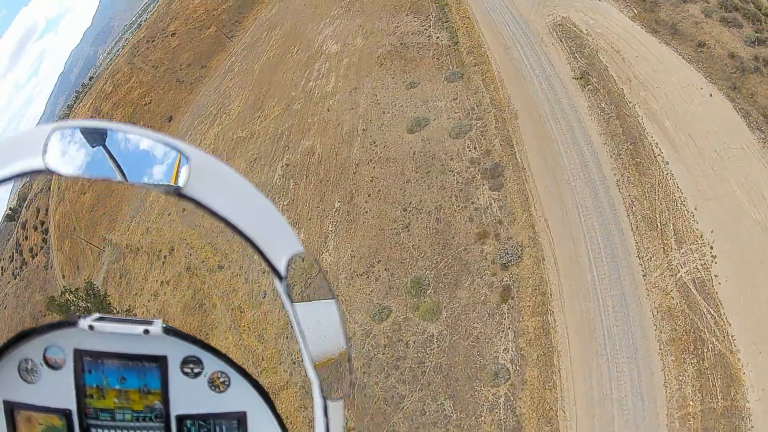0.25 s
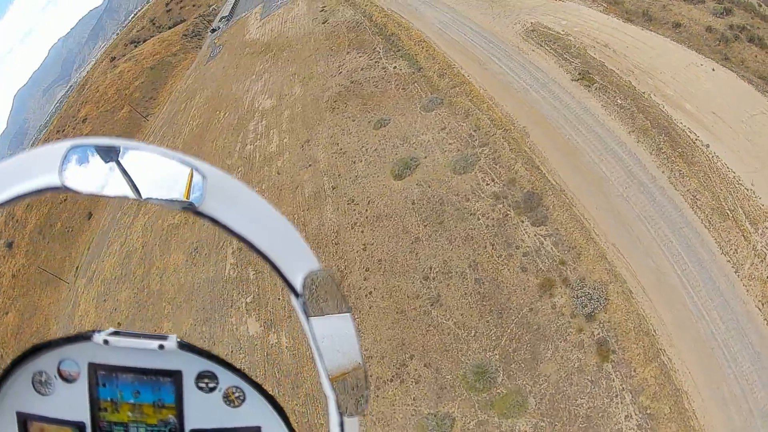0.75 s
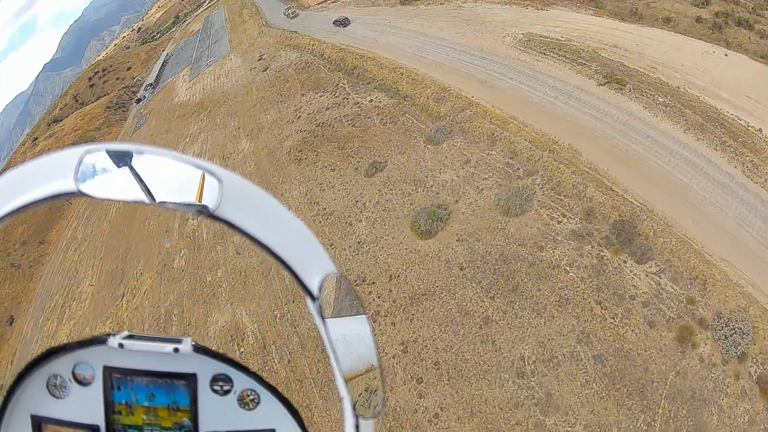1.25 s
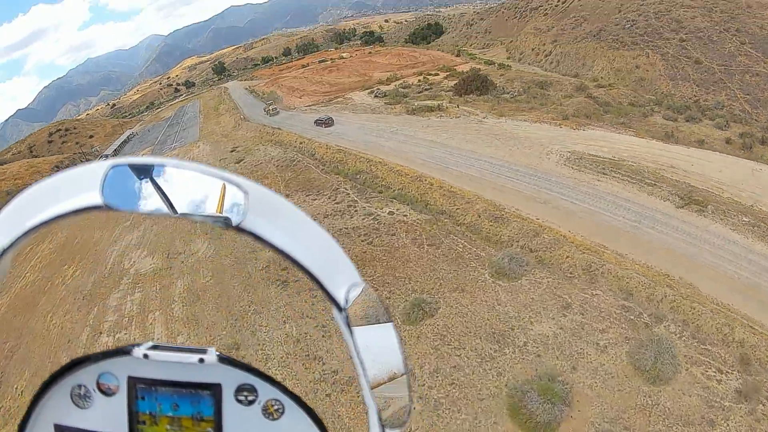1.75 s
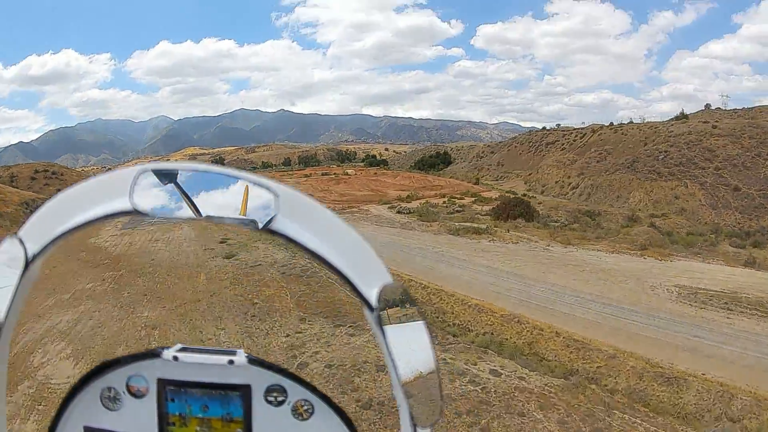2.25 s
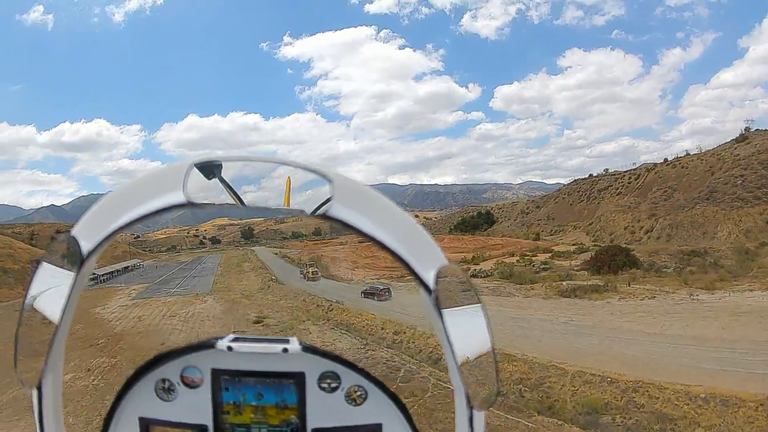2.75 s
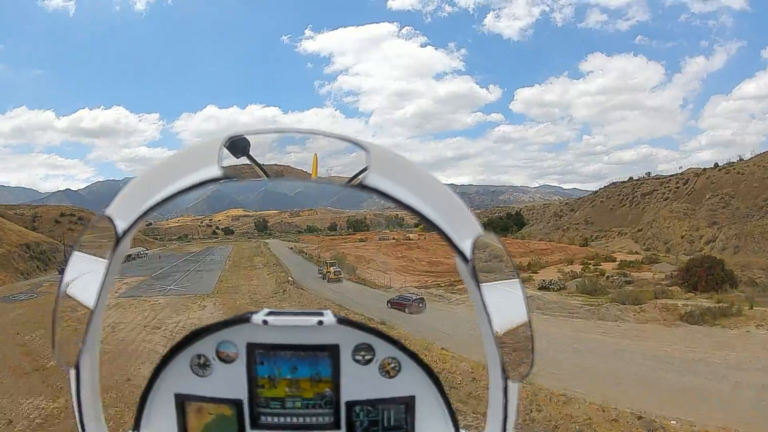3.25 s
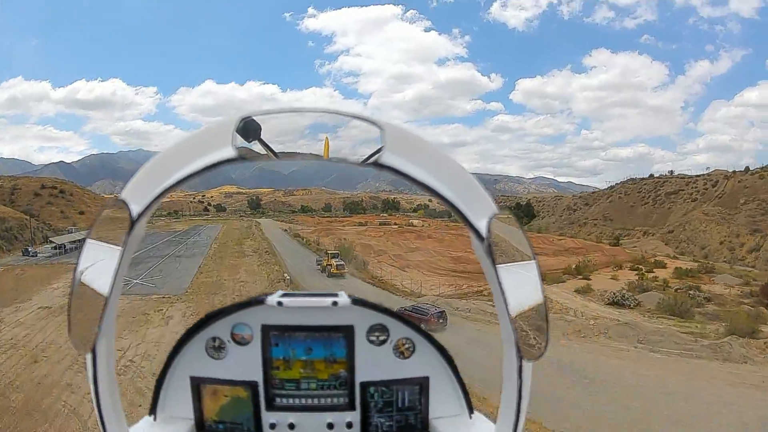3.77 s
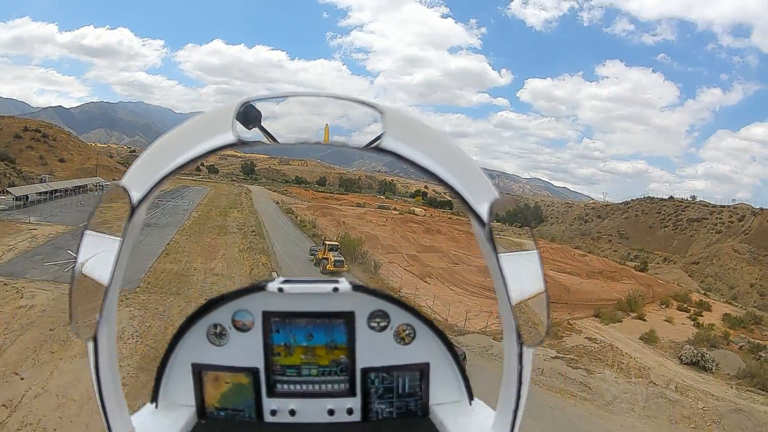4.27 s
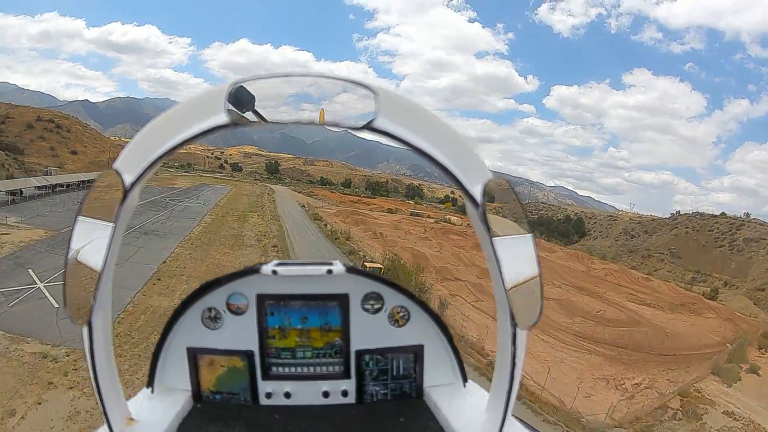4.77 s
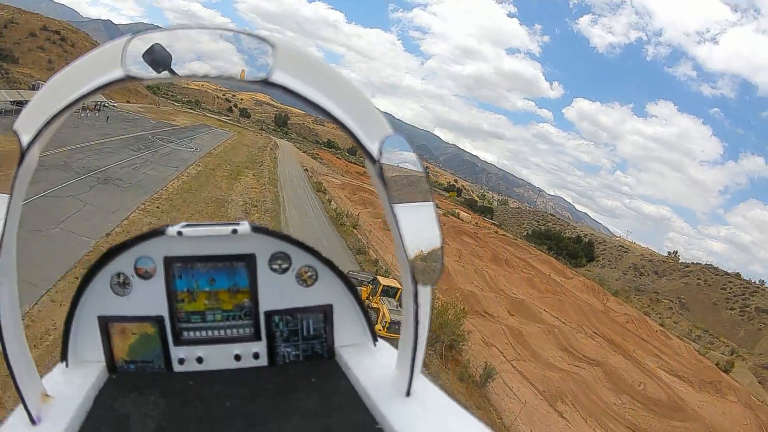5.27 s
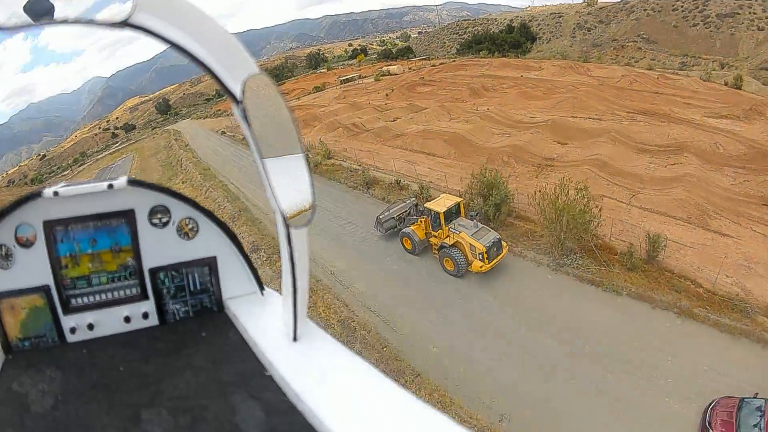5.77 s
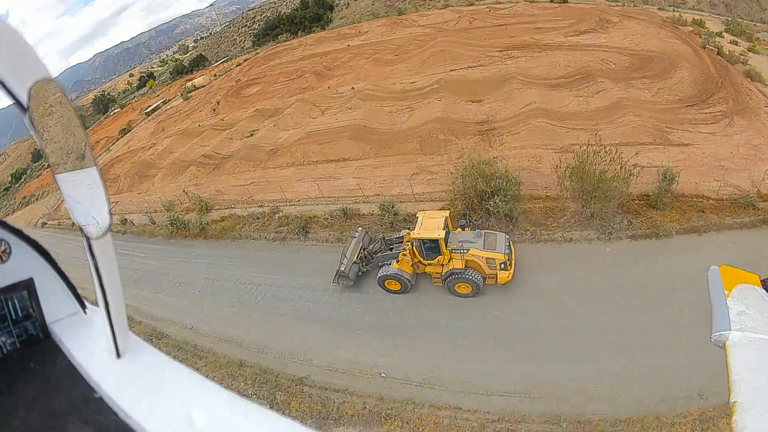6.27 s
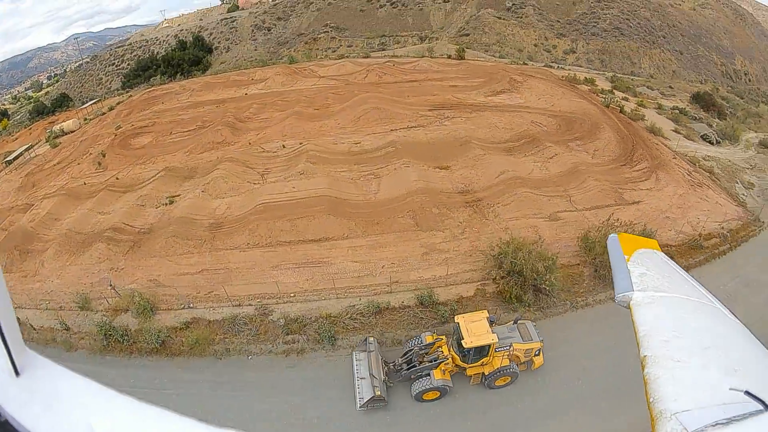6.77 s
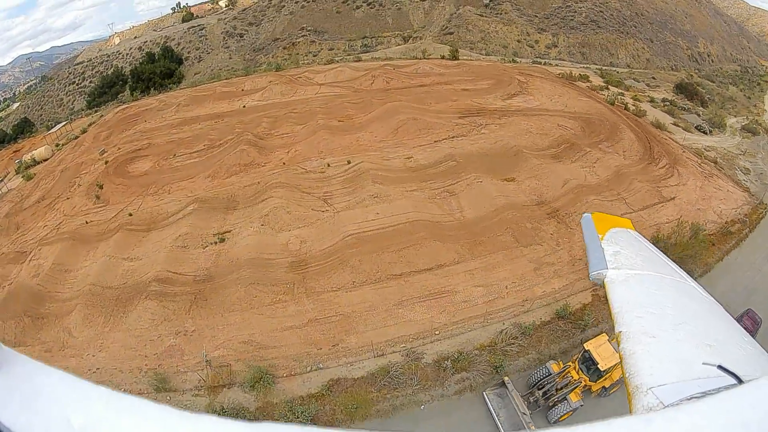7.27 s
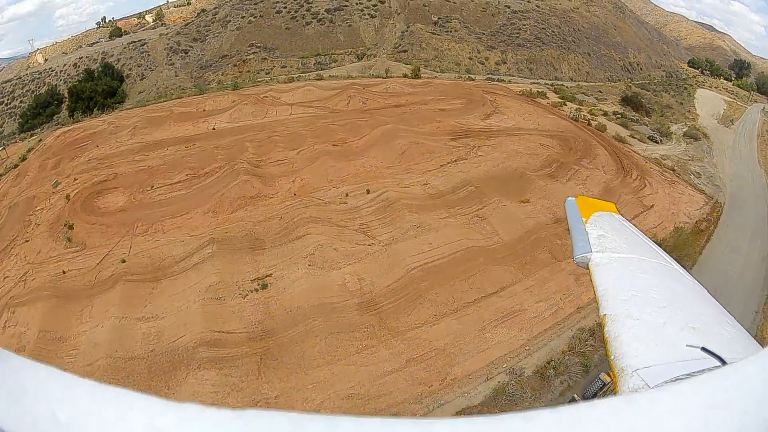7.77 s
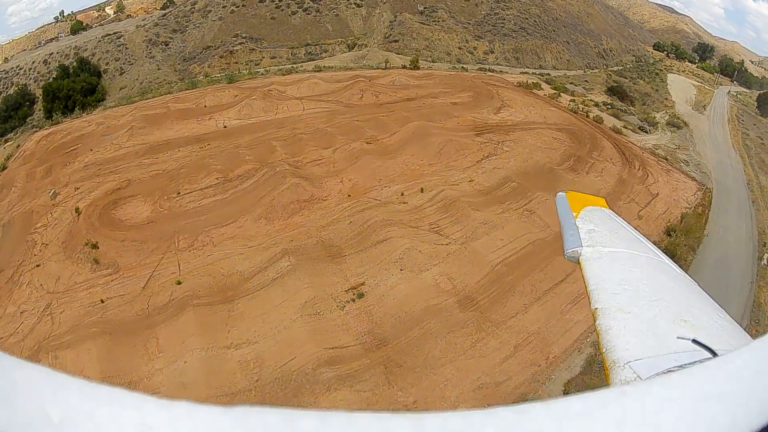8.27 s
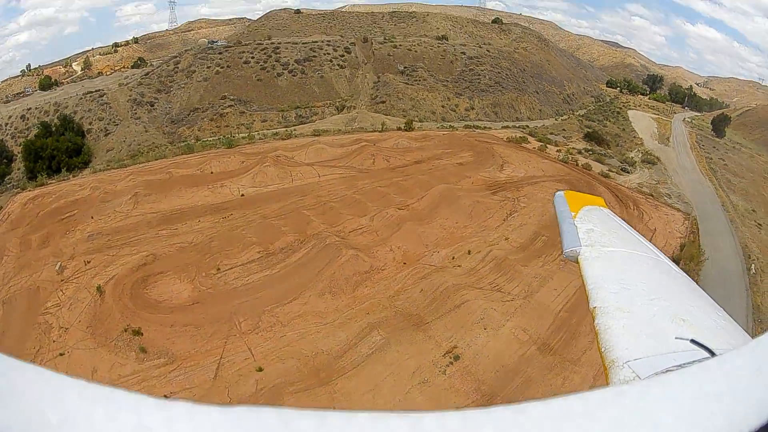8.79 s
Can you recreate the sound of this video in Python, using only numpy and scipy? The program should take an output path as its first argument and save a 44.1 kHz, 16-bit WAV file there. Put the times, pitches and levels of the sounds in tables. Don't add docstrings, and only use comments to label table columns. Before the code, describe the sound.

Close cockpit hum of a fan-driven model jet rises, dips sharply, then climbs again under wind buffet, gaining a bright buzzing rattle near the end.

```python
import sys
import numpy as np
from scipy import signal
from scipy.fft import rfft, irfft, next_fast_len
from scipy.io import wavfile

SR = 44100
rng = np.random.default_rng(int(sys.argv[2]) if len(sys.argv) > 2 else 0)


def convert_level_to_amplitude(level_db):
    exponent = np.asarray(level_db, float) / 20
    return 10 ** exponent


def transcribe(signal):
    frames = np.atleast_2d(signal).T
    limited = np.clip(frames, -1, 1)
    pcm = np.round(limited * 32767).astype(np.int16)
    wavfile.write(sys.argv[1], SR, pcm)


N = 398223
TIME_S = np.arange(N) / SR

# time_s, change_turns_per_s, spread_s
THROTTLE_MOVES = [(0.298, -4.7, 0.073), (1.636, 13.1, 0.133), (2.089, 7.5, 0.081), (2.569, 10.3, 0.18),
                  (3.699, -10.3, 0.055), (4.118, 3.6, 0.054), (4.422, 10.7, 0.469), (4.961, -13.5, 0.052),
                  (5.092, -54.6, 0.167), (5.726, 29.0, 0.156), (6.012, 35.5, 0.087), (6.243, 9.6, 0.126),
                  (6.691, 5.6, 0.121), (7.141, 18.3, 0.081), (7.417, 10.6, 0.093), (8.583, 4.3, 0.5),
                  (9.039, 55.0, 0.172)]
START_HZ, CRUISE_HZ = 336.5, 360

# time_s, level_db
UNBALANCE = [(0.0, -41.5), (0.07, -40), (1.21, -43), (3.37, -41.5), (3.49, -38), (3.97, -41), (4.15, -38),
             (4.83, -38), (5.23, -44), (5.73, -46), (5.83, -41), (5.96, -42.5), (6.04, -44.5), (6.31, -38),
             (6.79, -35.5), (7.49, -34.5), (8.8, -34.5), (9.03, -37.5)]
# cruise_db, slope_db_per_hz, lean_db, press_db, tap_db
ROTOR_ORDERS = [(-62, .2, -13, -2, 0), (-76, 0, 4, 6, 0), (-81, .25, 0, 2, 7), (-88, .15, 0, 0, 7.5),
                (-88, .2, 0, 0, 3), (-85, .12, 0, 0, 4.5), (-89, .15, 0, 0, 5), (-81, .02, -4, 9, 4),
                (-92, .1, 0, 0, -40), (-96, .2, 0, 0, -40)]
# centre_hz, width_hz, gain_db
HULL_RESONANCES = [(662, 20, -12), (815, 50, -7), (915, 55, 11.5), (995, 25, 9.5), (1130, 40, -2),
                   (1225, 80, 18), (2045, 70, 8), (2258, 40, 9), (3750, 90, 10)]
# centre_hz, width_hz, gain_db
MOUNT_RESONANCES = [(3030, 200, 8), (3360, 100, 2), (3900, 200, 18), (6520, 120, -2)]
# order, level_db (re order 18)
WHINE_ORDERS = [(18, -1), (27, -3.5), (36, -17)]
FADING_DB, GLIDE_DB_PER_HZ_S = 1.6, -0.035
WHINE_DB, WHINE_DB_PER_HZ, WHINE_LEAN_DB = -89, -0.0164, -5
WHINE_FLOW_SHARE = 0.8
DAMPED_DB = -9
FIRM_SHARE = 0.5

# time_s, level_db (re cruise)
FAN_FLOW = [(0, -4), (1.7, -4), (2.3, -2.5), (3.2, 0.6), (4.4, 0), (4.8, 1.5), (5.2, -8), (5.7, -8.5),
            (6.0, -3.5), (6.3, 0.5), (6.6, 1.5), (7.1, -0.7), (7.5, -1.5), (7.7, 2), (8.85, -1), (9.03, -4)]
# freq_hz, level_db_per_hz
BUFFET_SPECTRUM = [(8.8, -51.5), (15, -8), (86, -1.5), (188, -4.5), (263, -8), (290, -7.5), (380, -13),
                   (640, -120)]
# freq_hz, level_db_per_hz
SLIPSTREAM_SPECTRUM = [(140, -28), (240, -7.5), (311, -15.5), (370, 0.5), (455, -2.5), (559, -6), (694, -9),
                       (920, -7.5), (1010, -9), (1130, -7), (1530, -8.5), (2120, -17), (2360, -20.5),
                       (2600, -20), (3200, -26.5), (4160, -51.5), (7040, -120)]
# freq_hz, level_db_per_hz
INLET_SPECTRUM = [(1650, -33), (2800, -1), (4410, -1), (4790, -6), (5190, -4), (5900, -15), (7670, -37),
                  (13000, -120)]
# freq_hz, level_db_per_hz
DUCT_SPECTRUM = [(3240, -29), (5500, -23.5), (5740, -3), (6380, 0.5), (7110, -5), (8240, 2), (9190, -2.5),
                 (9900, -2), (11000, -10.5), (11900, -12.5), (14300, -13), (15600, -10.5)]
# centre_hz, width_hz, level_db (re surrounding air)
BLOWN_CAVITIES = [(2360, 230, -16.5), (9720, 100, -11.5)]
# time_s, gain_db, length_s
BUFFET_GUSTS = [(0.2, 1, 0.077), (2.7, 2, 0.34), (6.1, 4.5, 0.089)]
# time_s, gain_db, length_s
INLET_LULLS = [(0.42, -3.5, .2), (7.05, -4, .13)]
BUFFET_DB, BUFFET_DB_PER_S = -53, -0.5
SLIP_DB, SLIP_DB_PER_S, SLIP_FLOW_SHARE, SLIP_LEAN_DB = -63.5, -0.36, 0.26, -1.3
INLET_DB, INLET_FLOW_SHARE, INLET_TAP_DB = -79, 0.57, 3.5
DUCT_DB = -82.5

# start_s, end_s, strength_db, fade_s
TAPPING_SPELLS = [
    (7.53, 8.255, -72.5, .015),
    (8.43, 8.87, -72.0, .1),
]
# time_s, loss_db, length_s
LIFT_OFFS = [(8.1, 1.5, 0.032), (8.075, 1, .008), (8.165, 8, 0.0038), (8.55, 3, .012), (8.582, 24, 0.0024),
             (8.65, 8, 0.0036)]
# time_s, strength_db, length_s
BRIEF_TOUCHES = [(4.095, -82, 0.0055), (4.175, -88, .005), (4.228, -81, .007), (4.683, -91.5, .006),
                 (4.73, -91, 0.0089), (4.572, -79, .005), (4.606, -84.0, 0.0068), (4.7, -82, .008),
                 (4.797, -83, .008), (4.947, -93, .006)]
# time_s, peak_db
LONE_TICKS = [(5.6787, -51.5)]
# centre_hz, width_hz, level_db
PART_MODES = [(4105, 120, 1), (4670, 180, 0.5), (5120, 180, -12), (5600, 710, -9.5), (6420, 490, -3),
              (7600, 470, -8), (8120, 280, -10.5), (9920, 400, -8), (10940, 730, -11), (12200, 480, -12.5),
              (13400, 900, -7), (14500, 3100, -11), (15700, 280, -7.5)]
FIRST_TAP_DB, SETTLE_S = -11, 0.18
GRAZE_S, GRAZE_DB = 7.1, -89
HOVER_DB, FLUTTER_DB = -86, 4
UNEVEN_DB = 1.0
FIRST_LEAN_S, FIRST_LEAN_SHARE = 3.45, 0.32
LEAN_START_S, LEAN_END_S = 4.06, 4.92
PRESS_START_S, PRESS_END_S = 4.55, 4.91
SHIFT_S = 0.035

MIC_HISS_DB = -89.5


def rms_one(x):
    return x / np.sqrt(np.mean(x ** 2) + 1e-20)


def in_time(rows):
    time_s, level_db = np.transpose(rows)
    return np.interp(TIME_S, time_s, level_db)


def drift(rate_hz):
    r = np.exp(-40 * np.pi * rate_hz / SR)
    noise = rng.standard_normal(N // 20 + 4002)
    slow = signal.lfilter([1], [1, -2 * r, r * r], noise)[4000:]
    return np.interp(np.arange(N) / 20, np.arange(len(slow)), rms_one(slow))


def coloured(spectrum):
    size = next_fast_len(N)
    table_hz, level_db = np.transpose(spectrum)
    bin_hz = np.arange(size // 2 + 1) * SR / size
    shape = convert_level_to_amplitude(np.interp(np.log(bin_hz + 1), np.log(table_hz), level_db, left=-90))
    return rms_one(irfft(rfft(rng.standard_normal(size)) * shape, size)[:N])


def resonate(x, hz, width_hz):
    r = np.exp(-np.pi * width_hz / SR)
    turn = 2 * np.pi * min(hz, 19000) / SR
    zeros = np.array([1, 0, -1]) * (1 - r * r) / 2
    return signal.lfilter(zeros, [1, -2 * r * np.cos(turn), r * r], x)


def lift(modes, at_hz):
    grid_hz = np.arange(0., 16000., 5.)
    gain = 1 + sum(convert_level_to_amplitude(db) / (1 + (2 * (grid_hz - hz) / width_hz) ** 2) for hz, width_hz, db in modes)
    return np.interp(at_hz, grid_hz, 20 * np.log10(gain))


def bumps(rows):
    return sum(height * np.exp(-0.5 * ((TIME_S - time_s) / length_s) ** 2)
               for time_s, height, length_s in rows)


def spell(start_s, end_s):
    return np.clip(np.minimum(TIME_S - start_s, end_s - TIME_S) / SHIFT_S + 0.5, 0, 1)


def leaning():
    light = FIRST_LEAN_SHARE * spell(FIRST_LEAN_S, LEAN_END_S)
    return light + (1 - FIRST_LEAN_SHARE) * spell(LEAN_START_S, LEAN_END_S)


def tapping():
    return np.clip((TIME_S - TAPPING_SPELLS[0][0]) / 0.05 + 1, 0, 1)


def speed():
    return START_HZ + sum(change_hz * 0.5 * (1 + np.tanh((TIME_S - time_s) / spread_s))
                          for time_s, change_hz, spread_s in THROTTLE_MOVES)


def pressure():
    first_start_s, first_end_s = TAPPING_SPELLS[0][:2]
    light = np.where(TIME_S > GRAZE_S, convert_level_to_amplitude(GRAZE_DB), convert_level_to_amplitude(-150))
    light = light + (TIME_S > first_end_s) * convert_level_to_amplitude(HOVER_DB + FLUTTER_DB * drift(25))
    firm = np.zeros(N)
    for start_s, end_s, strength_db, fade_s in TAPPING_SPELLS:
        attack = np.clip((TIME_S - start_s) / 0.011, 0, 1)
        firm += convert_level_to_amplitude(strength_db) * attack * np.exp(-np.maximum(TIME_S - end_s, 0) / fade_s)
    settling_db = FIRST_TAP_DB * np.clip(1 - (TIME_S - first_start_s) / SETTLE_S, 0, 1)
    return (light + firm * convert_level_to_amplitude(settling_db)) * convert_level_to_amplitude(UNEVEN_DB * drift(12) - bumps(LIFT_OFFS))


def order_levels(turns_hz, pressed):
    faster_hz = turns_hz - CRUISE_HZ
    load_db = WHINE_FLOW_SHARE * in_time(FAN_FLOW)
    firm = np.minimum(pressed / convert_level_to_amplitude(TAPPING_SPELLS[0][2]), 1)
    lean = leaning()
    states = lean, spell(PRESS_START_S, PRESS_END_S), tapping() * (1 - FIRM_SHARE * (1 - firm))
    slack = np.clip(-faster_hz / 30, 0.15, 1)
    sweep_hz_per_s = np.abs(np.gradient(turns_hz) * SR)
    orders = []
    for order, (cruise_db, slope_db_per_hz, *shifts_db) in enumerate(ROTOR_ORDERS, start=2):
        fading_db = FADING_DB * (slack if order < 4 else 1) * drift(4)
        level_db = cruise_db + slope_db_per_hz * faster_hz + fading_db
        level_db += sum(shift_db * state for shift_db, state in zip(shifts_db, states))
        if order > 2:
            level_db += GLIDE_DB_PER_HZ_S * sweep_hz_per_s
        if order == 9:
            level_db += lift(MOUNT_RESONANCES, order * turns_hz) + load_db + DAMPED_DB * firm
        else:
            level_db += lift(HULL_RESONANCES, order * turns_hz)
        orders.append((order, level_db))
    whine_db = WHINE_DB + WHINE_DB_PER_HZ * faster_hz + WHINE_LEAN_DB * lean + load_db
    whine_db += lift(MOUNT_RESONANCES, 18 * turns_hz)
    top_speed_loss_db = np.clip(turns_hz - 380, 0, 20)
    for order, level_db in WHINE_ORDERS:
        orders.append((round(order), whine_db + level_db - top_speed_loss_db))
    return orders


def rotor(angle, orders):
    out = np.zeros(N)
    for order, level_db in orders:
        waver_db = 0.45 * np.sqrt(order) * drift(28)
        lag = 1.35 * order * (order - 1)
        out += convert_level_to_amplitude(level_db + waver_db) * np.sqrt(2) * np.cos(order * angle + lag)
    return out


def air_levels():
    flow_db = in_time(FAN_FLOW)
    buffet_db = BUFFET_DB + BUFFET_DB_PER_S * TIME_S + bumps(BUFFET_GUSTS)
    slipstream_db = SLIP_DB + SLIP_DB_PER_S * TIME_S + SLIP_FLOW_SHARE * flow_db
    slipstream_db += SLIP_LEAN_DB * spell(FIRST_LEAN_S, LEAN_END_S)
    inlet_db = INLET_DB + INLET_FLOW_SHARE * flow_db + INLET_TAP_DB * tapping() + bumps(INLET_LULLS)
    return buffet_db, slipstream_db, inlet_db, DUCT_DB + flow_db


def cavity(hz, width_hz, level_db):
    tone = resonate(resonate(rng.standard_normal(N), hz, width_hz), hz, width_hz)
    return convert_level_to_amplitude(level_db + 1.9 * drift(0.8)) * rms_one(tone)


def air(angle, buffet_db, slipstream_db, inlet_db, duct_db):
    gust = drift(21)
    pulse_db = 0.5 * gust + 0.41 * drift(42) + 0.8 * np.cos(angle - 0.6)
    low, high = [cavity(*row) for row in BLOWN_CAVITIES]
    buffet = convert_level_to_amplitude(buffet_db + 1.15 + 0.27 * drift(1.4)) * coloured(BUFFET_SPECTRUM)
    slipstream = convert_level_to_amplitude(slipstream_db + 8.5 + 0.4 * gust) * (coloured(SLIPSTREAM_SPECTRUM) + low)
    inlet = convert_level_to_amplitude(inlet_db + 10.0 + pulse_db) * coloured(INLET_SPECTRUM)
    duct = convert_level_to_amplitude(duct_db + 8.0 + pulse_db) * (coloured(DUCT_SPECTRUM) + high)
    return buffet + slipstream + inlet + duct


def buzz(angle, pressed):
    strength = pressed + bumps([(time_s, convert_level_to_amplitude(db), length_s) for time_s, db, length_s in BRIEF_TOUCHES])
    turns = np.flatnonzero(np.diff(np.floor(angle / (2 * np.pi) + 0.29)) > 0)[:-2]
    chance = rng.standard_normal((int(N / SR * 500), 4))[:len(turns)]
    size = (strength * convert_level_to_amplitude(0.57 * drift(80)))[turns] * convert_level_to_amplitude(39.0 + 2.5 * chance[:, 0])
    hardness = convert_level_to_amplitude(1.4 * chance[:, 3])
    body = size * (pressed[turns] ** 0.8 * convert_level_to_amplitude(-15.0) / strength[turns] + 0.2)
    push, soft, hard = np.full((3, N), 1e-18)
    push[turns] += strength[turns] * convert_level_to_amplitude(40.0 + 1.0 * chance[:, 0])
    push = resonate(push, 4200, 900)
    tap, rebound = (0, 0.00003, 6, 1), (0.0008, 0.00014, -26, 2)
    for late_s, scatter_s, level_db, column in (tap, rebound):
        at = (turns + (late_s + scatter_s * chance[:, column]) * SR).astype(int)
        np.add.at(soft, at, body * convert_level_to_amplitude(level_db))
        np.add.at(hard, at, size * hardness * convert_level_to_amplitude(level_db - 5.0))
    for time_s, peak_db in LONE_TICKS:
        soft[round(time_s * SR)] += convert_level_to_amplitude(peak_db + 17.0)
        hard[round(time_s * SR)] += convert_level_to_amplitude(peak_db + 14.0)
    rings = np.zeros(N)
    for k, (hz, width_hz, level_db) in enumerate(PART_MODES):
        force = push if hz < 5000 else soft if hz < 9000 else hard
        rings += (-1) ** k * convert_level_to_amplitude(level_db) * resonate(force, hz, width_hz)
    return signal.lfilter(*signal.iirnotch(15100, 25.0, fs=SR), rings)


def scene():
    turns_hz, pressed = speed(), pressure()
    angle = 2 * np.pi * np.cumsum(turns_hz + 0.5 * drift(12)) / SR
    orders = [(1, in_time(UNBALANCE))] + order_levels(turns_hz, pressed)
    noise = air(angle, *air_levels()) + buzz(angle, pressed)
    noise = noise - 0.62 * tapping() * resonate(noise, 5040, 330)
    return (rotor(angle, orders) + noise)[None]


def low_pass(x):
    return signal.sosfilt(signal.butter(12, 15710, fs=SR, output="sos"), x)


def record(dry):
    high_pass = signal.butter(2, 10500, "high", fs=SR, output="sos")
    hiss = signal.sosfilt(high_pass, rng.standard_normal(N))
    return low_pass(dry + convert_level_to_amplitude(MIC_HISS_DB) * hiss)


dry = scene()
out = record(dry)
transcribe(out)
```